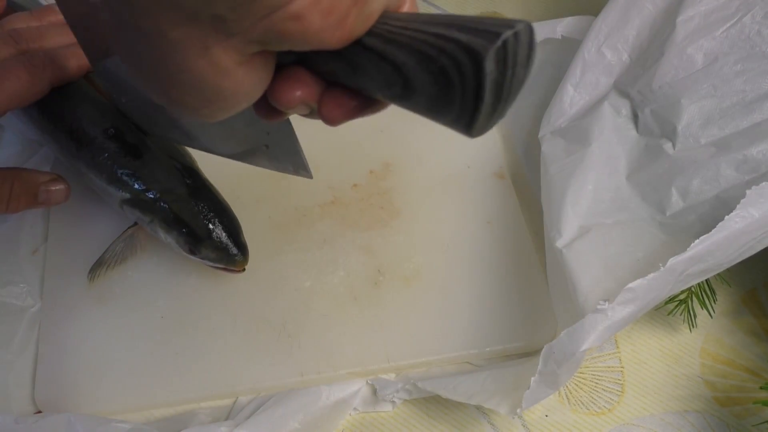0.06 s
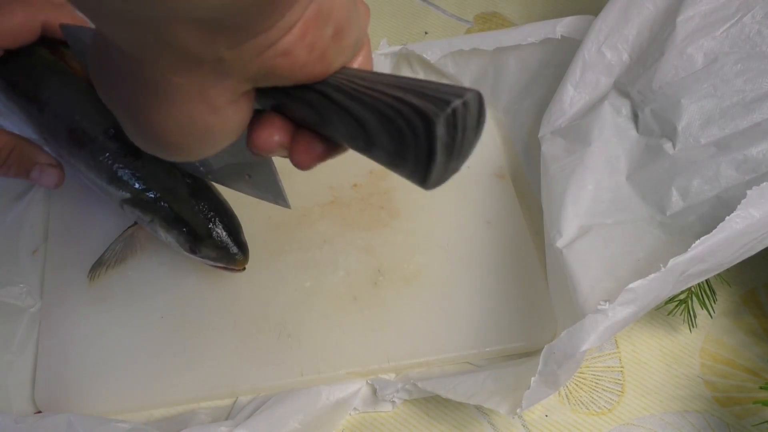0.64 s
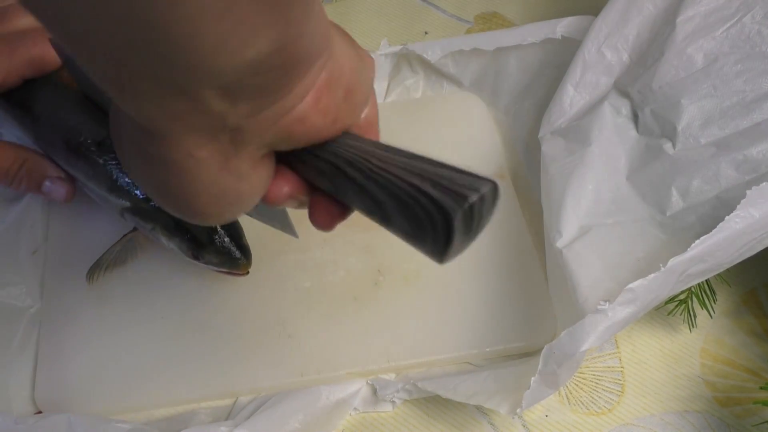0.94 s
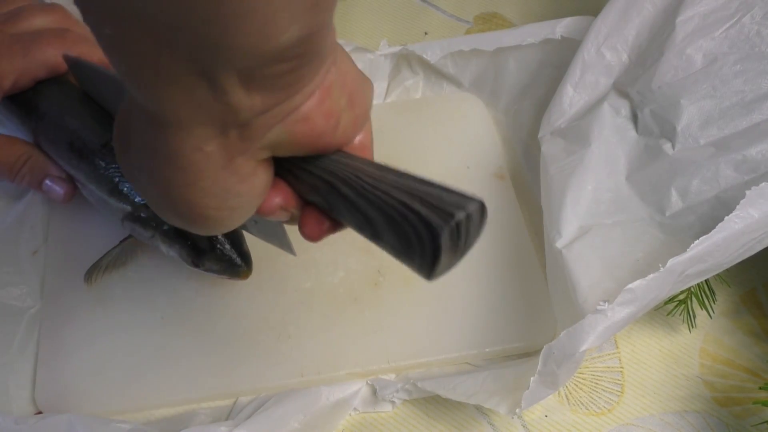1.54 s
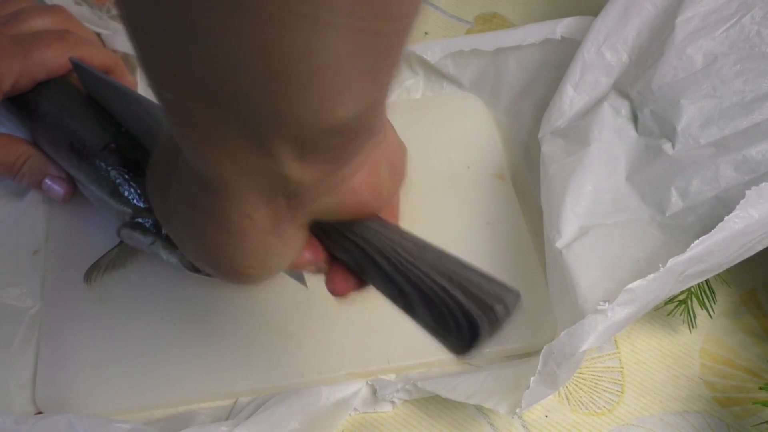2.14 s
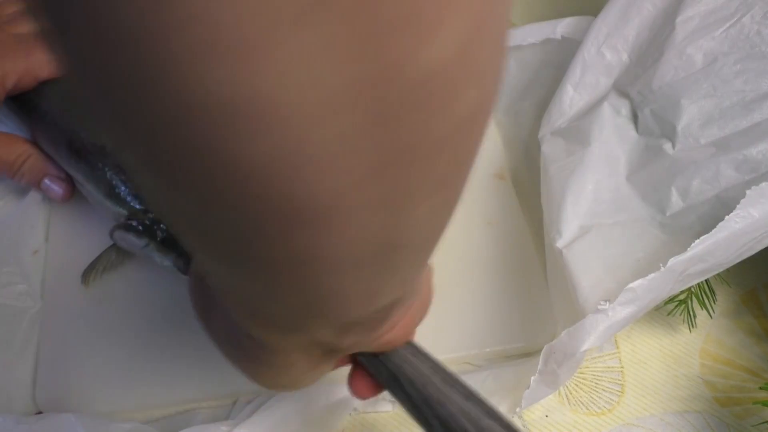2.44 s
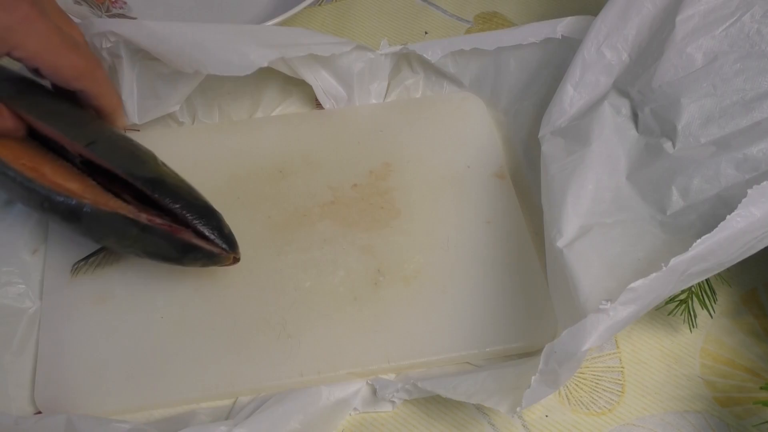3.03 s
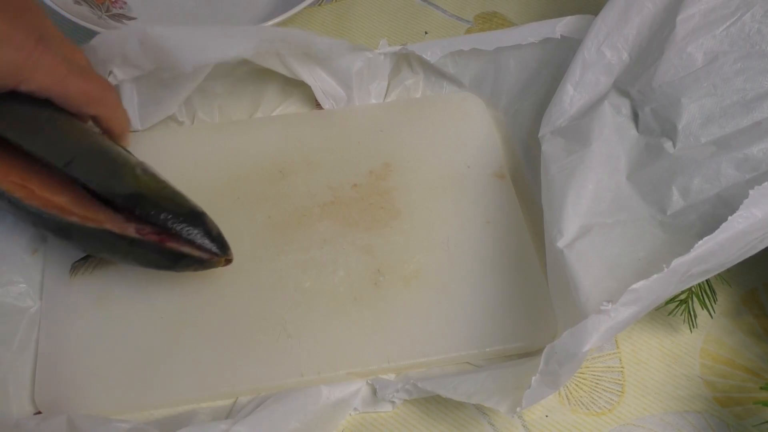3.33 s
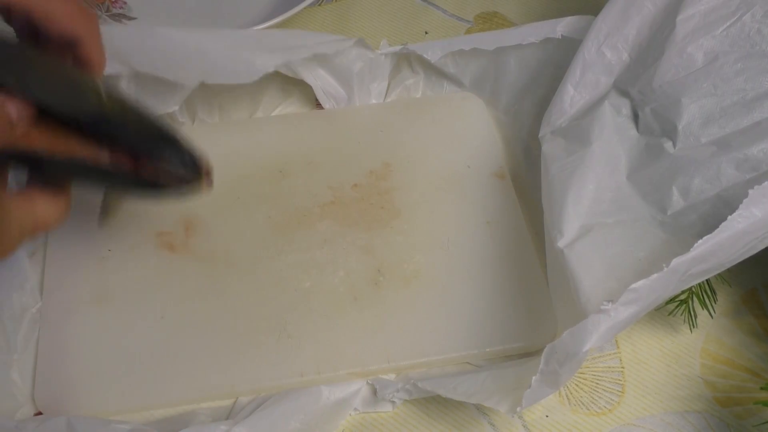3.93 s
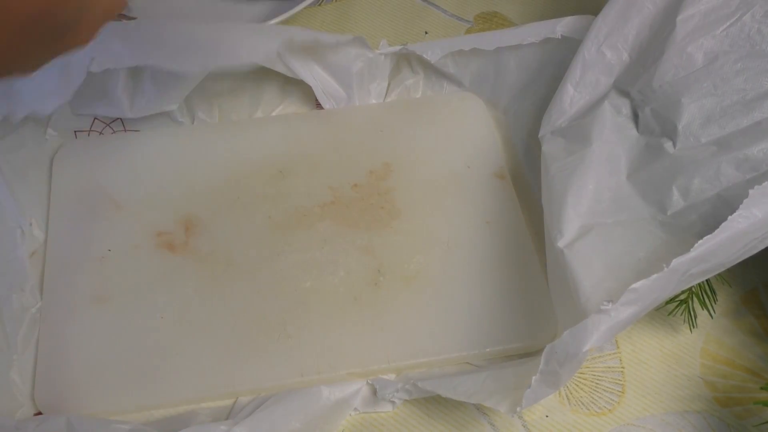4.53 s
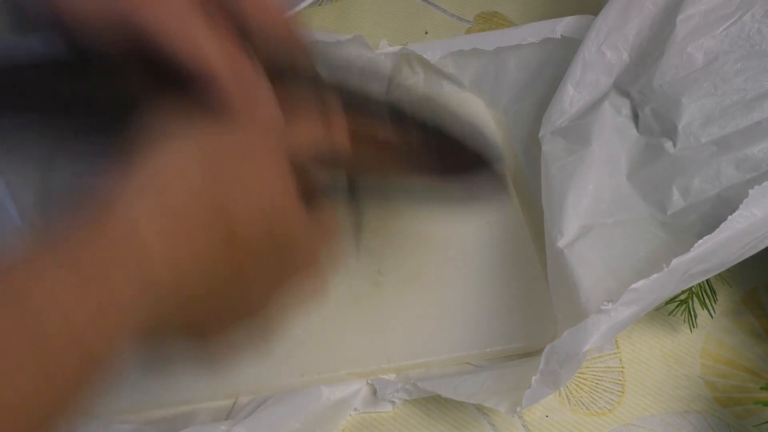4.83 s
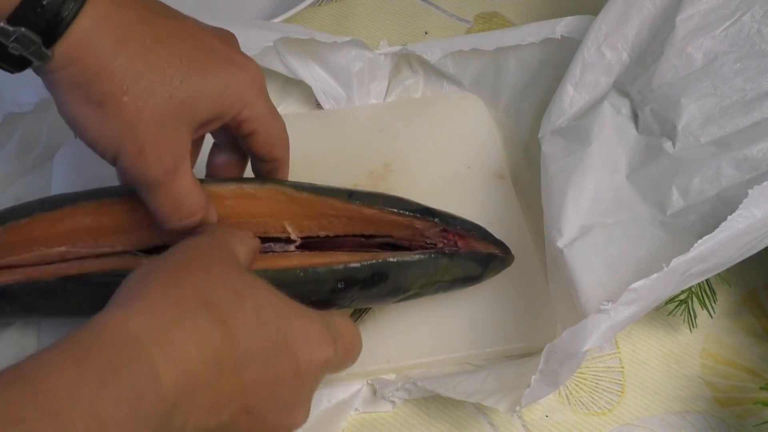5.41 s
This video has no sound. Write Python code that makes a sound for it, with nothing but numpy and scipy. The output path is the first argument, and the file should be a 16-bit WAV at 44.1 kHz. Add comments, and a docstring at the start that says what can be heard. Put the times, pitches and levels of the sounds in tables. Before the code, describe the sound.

A kitchen knife crunches through fish bones, clinks down on a plate, then plastic rustles as the fish is moved.

```python
"""A bone cracks and plastic rustles; then a big kitchen knife crunches through a fish's head on a plastic board.
Each brittle fracture is an impulse that rings the bone, cartilage tears as a dense train of ruptures, wet
flesh ticks, and the jerking blade drives the low modes of board and table. The knife is put down on a
plate, and both ring briefly. The fish is dragged over the crumpled sheet under the board, whose creases
buckle and crackle, and is laid back. A close stereo microphone hears it all in a small, live kitchen."""
import sys
import numpy as np
from scipy import signal
from scipy.fft import rfft, irfft, next_fast_len
from scipy.io import wavfile
from scipy.ndimage import uniform_filter1d

SR = 44100
rng = np.random.default_rng(int(sys.argv[2]) if len(sys.argv) > 2 else 0)


def dump_mix(stems):
    """Bounce the given channels to the path in sys.argv[1] as a 16-bit WAV at rate SR."""
    frames = np.atleast_2d(stems).T  # one column per channel
    limited = np.clip(frames, -1, 1)  # hard clip at full scale
    pcm = np.round(limited * 32767).astype(np.int16)
    wavfile.write(sys.argv[1], SR, pcm)


N = 245365

# Levels in the tables are relative: filters and mix gains follow.
# bones snapping, and a few faint wet ticks of flesh parting: start_s, crack_db, body_re_crack_db, pitch_hz
CRACKS_AND_TICKS = [(0.0518, -24.5, 1, 3260), (0.2263, -40.5, 1, 3280), (1.1031, -21, -5, 2170),
                    (1.146, -16, -15.5, 2210), (1.262, -34, 5, 2090), (1.4226, -31.5, -3, 2490),
                    (1.557, -25, 4.5, 1890), (1.6484, -21, -8, 2290), (1.857, -27, 5.5, 2860),
                    (1.909, -30, -1, 2880), (1.975, -30.5, 10.5, 2160), (1.988, -22.5, -5, 3000),
                    (2.144, -40, -9, 3300), (2.164, -33.5, -21, 2220), (2.2848, -28, 8, 2960),
                    (2.3267, -23, 5, 3000), (2.370, -13.5, 2.5, 1840), (2.604, -32.5, 1, 1302),
                    (2.656, -34.5, 21.5, 2324), (2.6962, -41.5, 29.5, 2400), (3.1372, -47.5, 15, 3020),
                    (5.289, -28.5, -11, 2980)]
# pushes of the blade through cartilage: start_s, length_s, crunch_db, swell_db, bone_pitch_hz, push_db
BLADE_CUTS = [(1.098, 0.058, -49, 7, 2400, -41.5), (1.258, .04, -54, -3, 2000, -52),
              (1.425, 0.044, -49, -7.5, 2510, -68), (1.549, 0.11, -42, 6.5, 2110, -33.5),
              (1.855, 0.13, -56, 0, 2950, -44), (1.976, .045, -44.5, -2, 2200, -35),
              (2.285, .088, -33.5, 2.5, 3087, -22.5), (2.653, .058, -26, -8, 2480, -22)]
# spectrum of the cracks and ticks: frequency_hz, level_db
SNAP_SPECTRUM = [(400, -1.5), (800, -4), (1400, 5), (2800, 4.5), (4200, -1.5), (6500, -2.5), (9500, 2),
                 (13000, 4), (16000, 4)]
# spectrum of tearing cartilage: frequency_hz, level_db
CRUNCH_SPECTRUM = [(400, -6.5), (800, -8.5), (1300, 0.5), (2600, -0.5), (4200, -3), (7000, -12), (9500, -2),
                   (13000, -11.5), (16000, -8)]
# modes of board and table: pitch_hz, level_db, t60_s
BOARD_MODES = [(62, -12, 0.46), (110.6, 1, 0.26), (129.8, 3, 0.23), (164.1, -2, 0.37), (196.1, 9, 0.12),
               (235.6, 3.5, 0.16), (271, 1, 0.12), (310.5, -2, 0.16), (363.3, -5, .15), (499, -13, 0.038),
               (653, -17.5, 0.035)]

# knife landing on the plate, handle then blade: start_s, knock_db, cutoff_hz, push_db, plate_ring_db
KNIFE_KNOCKS = [(3.2944, -9.5, 1260, -32, -44.5), (3.3649, -9.5, 4030, -49, -41.5)]
# modes of the knife, damped by the hand: pitch_hz, level_db, t60_s
DAMPED_KNIFE_MODES = [(315, -8, 0.027), (770, -6, 0.0097), (1010, -5.5, 0.011), (1250, -0.5, 0.019),
                      (1440, -13, 0.053), (1660, -4, 0.013), (2240, -12, 0.016), (3370, -11, .01),
                      (4440, -5, 0.0091)]
# free modes of the plate: pitch_hz, level_db, t60_s
PLATE_MODES = [(974, 3.5, 0.86), (1217, -17, 0.7), (1240, 9.5, .5), (1498, 0.5, 1), (1600, 3, 0.38),
               (1716, 0, 0.93), (1810, -1, 1), (1970, -8, 0.71), (2367, 11, 0.77), (2740, 0, 0.8),
               (3200, -18, 0.38), (4570, -19, 0.34)]
# mode of the table under the dropped blade: pitch_hz, level_db, t60_s
TABLE_MODES = [(62, -31, 0.053)]
# modes of the steel sliding over the rim: pitch_hz, level_db, t60_s
HELD_BLADE_MODES = [(1991, 2, .55), (2406, -5, .4), (3047, -14, .2), (3900, -16, .2), (4811, -12, .25)]
# modes of the steel once let go: pitch_hz, level_db, t60_s
FREE_BLADE_MODES = [(2406, -1, .16), (4811, -29, .3), (2415, -14, .45), (6850, -29, .2), (11700, -26, .08)]
# spectrum of steel scraping the rim: frequency_hz, level_db
SCRAPE_SPECTRUM = [(300, -3), (700, -5), (1200, -3), (2400, 7), (4500, 4), (7000, -4.5), (10000, 1),
                   (16000, -3)]

# fish and hands sliding on the sheet: fastest_s, rise_s, fall_s, rustle_db, dull_part_db, rasp_hz
SHEET_SLIDES = [(.415, 0.052, 0.042, -38, -2, 1210), (0.474, 0.052, 0.16, -40, 2.5, 1220),
                (.73, 0.031, 0.044, -43.5, 1.5, 1270), (.965, 0.15, 0.11, -39.5, 0.5, 1220),
                (3.17, 0.085, 0.12, -52.5, 8.5, 2400), (3.613, 0.082, 0.13, -33, -0.5, 1280),
                (3.952, .11, 0.063, -32.5, -4, 1960), (4.271, 0.23, 0.32, -39.5, -1.5, 2230),
                (4.69, 0.03, 0.22, -53, 5, 2650), (5.001, 0.025, 0.089, -25, -15, 2270),
                (5.10, 0.035, 0.044, -33.5, -4, 2250), (5.203, 0.044, .055, -36, -2.5, 2180),
                (5.442, 0.097, 0.059, -44, 0, 2080), (5.55, .04, .05, -47, 2.5, 2100)]
# sheet stirring under the hand that holds the fish: start_s, length_s, rustle_db
SHEET_STIRS = [(1.18, 0.31, -62), (2.5, 0.608, -59.5)]
# larger creases flipping over: start_s, level_db
CREASE_FLIPS = [(0.3867, -24), (.422, -17), (0.4829, -19), (0.6974, -28.5), (3.6242, -21), (4.305, -29),
                (4.356, -21), (4.957, -25), (5.3884, -29.5)]
# spectrum of the crackling sheet: frequency_hz, level_db
RUSTLE_SPECTRUM = [(100, -3), (330, 0), (600, -9.5), (850, -9), (1150, -1), (1650, -1.5), (2250, -0.5),
                   (4000, 0), (6500, -3.5), (9500, -0.5), (13000, -1.5), (16000, -6.5)]
# heavy fish shifting on the board: start_s, length_s, push_db
FISH_SHIFTS = [(.745, 0.019, -49.5), (3.64, 0.063, -50), (4.33, 0.094, -59), (5.06, 0.093, -49.5)]

# reverberation time of the kitchen: frequency_hz, t60_s
REVERB_TIMES = [(120, 0.51), (300, 0.54), (700, 0.79), (1500, 0.67), (4000, 0.42), (14000, 0.18)]
# strength of the reverberation: frequency_hz, level_db
REVERB_SPECTRUM = [(120, -6), (400, 1), (1200, 0), (4000, 0), (9000, 4.5), (15000, -11)]
# left-right likeness of the diffuse field: frequency_hz, correlation
FIELD_COHERENCE = [(200, 0.93), (500, 0.35), (1500, 0.067), (5000, -0.43), (9000, 0.0043), (13000, 0.75)]
# spectrum of the room tone: frequency_hz, level_db
ROOM_TONE_SPECTRUM = [(25, -9), (120, -5), (250, -3), (600, -14), (1200, -8), (2500, -9), (5000, -17),
                      (9000, -19), (16000, -22)]
# level difference between the microphones: frequency_hz, left_minus_right_db
MIC_BALANCE = [(60, 7.5), (150, -1), (300, -4), (600, -7.5), (1100, -6), (2300, -4), (4000, -4.5),
               (6600, -11), (9500, -4.5), (13000, -1)]
# phase difference between the microphones: frequency_hz, left_lead_rad
MIC_PHASE = [(30, -1), (120, -1.23), (350, -1.45), (700, -1.24), (1300, -0.62), (5000, -0.8),
             (14000, -0.14)]

DULL_HZ = 2050   # upper edge of the dull part of the rustle


def splitting():
    """Common excitation: the same pushes of the hand break the bones and crush the cartilage."""
    crunch_rows = [row[:4] for row in BLADE_CUTS]
    push_rows = [(s, length_s, push_db, 0) for s, length_s, *_, push_db in BLADE_CUTS]
    crunch = pushes(crunch_rows, bite_db=-11, ease_db=-4.5, ease_db_per_s=134)
    pressure = pushes(push_rows, bite_db=-29, ease_db=-13.5, ease_db_per_s=145)
    return cracks_and_ticks(crunch, pressure) + cartilage(crunch, pressure)


def pushes(rows, bite_db, ease_db, ease_db_per_s, bite_db_per_s=270):
    """Loading and yield: the envelope grows as the blade bites, jumps as tissue gives, then eases off."""
    t, out = np.arange(N) / SR, np.zeros(N)
    for s, length_s, level_db, swell_db in rows:
        age = t - s
        biting = bite_db + bite_db_per_s * age
        easing = swell_db + ease_db - ease_db_per_s * (age - length_s)
        shape_db = np.select([age < 0, age < length_s], [biting, swell_db * age / length_s], easing)
        out += amp(level_db + shape_db)
    return out


def cracks_and_ticks(crunch, pressure, q=3.84, ring_db=4.5, jolt_db=-6):
    """Impulse response: snapping bone or parting flesh rings briefly and, under load, jolts the board."""
    cracks, jolts = np.zeros((2, N))
    for s, crack_db, body_db, pitch_hz in CRACKS_AND_TICKS + splinters(crunch):
        burst = amp(crack_db) * crack(length_s=.0011)
        hollow = signal.lfilter(*signal.iirpeak(pitch_hz, q, fs=SR), burst)
        add(cracks, s, shelf(burst, body_db - 6, split_hz=4500) + amp(body_db + ring_db) * hollow)
    for s, *_ in CRACKS_AND_TICKS:
        add(jolts, s, [pressure[int((s + .005) * SR)]])   # as hard as the hand is pushing
    return colour(cracks, SNAP_SPECTRUM) + amp(jolt_db) * board(lowpass(jolts, hz=870))


def splinters(crunch, per_s=60, offset_db=-2.5, spread_db=12, body_db=8.5, detune=.06):
    """Brittle fracture: small bones snap at uneven intervals in each push, scaled by the crunch."""
    rows = []
    for s, length_s, _, _, bone_hz, _ in BLADE_CUTS:
        count = int(length_s * per_s)
        for k, (jitter, size, pitch) in enumerate(rng.uniform(-1, 1, (12, 3))[:count]):
            start_s = s + length_s * (k + .5 + jitter / 2) / count
            crack_db = 20 * np.log10(crunch[int(start_s * SR)]) + offset_db + spread_db * size
            rows.append((start_s, crack_db, body_db, bone_hz * (1 + detune * pitch)))
    return rows


def crack(length_s, size=1024):
    """Sudden stress release: one click, dispersed by all-pass echoes with lags under length_s."""
    burst = signal.unit_impulse(size)
    for lag in rng.uniform(.1, .7, 3) * length_s * SR:
        loop = np.r_[1, np.zeros(int(lag)), rng.choice([-.55, .55])]
        burst = signal.lfilter(loop[::-1], loop, burst)
    return burst * np.sqrt(length_s * SR)


def cartilage(crunch, pressure):
    """Superposition: many breaking fibres merge into a crunch while the jerky blade shakes the board."""
    fibres = grains(per_s=3500, spread_db=2.8)
    return colour(crunch * fibres, CRUNCH_SPECTRUM) + thuds(pressure)


def grains(per_s, spread_db, bands=9):
    """Shot noise of unit power: tiny random ruptures, each with its own size and spectrum."""
    onsets = rng.random(N) < per_s / SR
    sizes = onsets * amp(spread_db * np.minimum(rng.exponential(1, N), 4))
    edges = [60, *np.geomspace(900, 18000, bands)]
    out = np.zeros(N)
    for band in zip(edges, edges[1:]):
        out += butterworth(sizes * rng.standard_normal(N) + 1e-18, band, "band")
    return unit_power(out)


def thuds(pressure, jerks_per_s=700, fade_s=0.014):
    """Stick-slip friction: uneven jerks shake the board as hard as it is pushed, then the energy decays."""
    jerks = (rng.random(N) < jerks_per_s / SR) * rng.choice([-1, 1], N)
    shaking = board(jerks)
    local_rms = np.sqrt(np.abs(uniform_filter1d(shaking ** 2, size=1400)) + 1e-6)
    retained = np.exp(-1 / (fade_s * SR))
    energy = signal.lfilter([1 - retained], [1, -retained], pressure ** 2 + 1e-18)
    return np.sqrt(energy) * shaking / local_rms


def board(force):
    """Radiation efficiency: board and table ring in low modes but give off little deep bass."""
    return butterworth(ring(force, BOARD_MODES), 75, "high")


def wet_flesh(per_s=10, loudest_db=-39.5, spread_db=11):
    """Sparse random impulses: wet flesh ticks faintly from the first cut until the knife is put down."""
    ticks, start, end = np.zeros(N), BLADE_CUTS[0][0], KNIFE_KNOCKS[0][0]
    for when, size in rng.random((int((end - start) * per_s), 2)):
        tick = amp(loudest_db - spread_db * size) * crack(length_s=0.0013)
        add(ticks, start + when * (end - start), tick)
    return colour(ticks, SNAP_SPECTRUM)


def knife_on_plate(bounce_s=.0033, bounce_db=-7):
    """Impact: harder contact is brighter, so the handle knocks and the blade clacks; the plate rings."""
    blows, push, rim, clack = np.zeros((4, N))
    for s, knock_db, cutoff_hz, push_db, ring_db in KNIFE_KNOCKS:
        contact = amp(knock_db) * lowpass(signal.unit_impulse(256), cutoff_hz)
        add(blows, s, contact)
        add(blows, s + bounce_s, amp(bounce_db) * contact)
        add(push, s, [amp(push_db)])
        add(rim, s, [amp(ring_db)])
    drop_s = KNIFE_KNOCKS[-1][0]
    add(clack, drop_s, amp(-35) * shelf(crack(length_s=.003), low_db=23.5, split_hz=3900))
    thump = ring(signal.unit_impulse(N, int(drop_s * SR)), TABLE_MODES)
    knife = ring(blows, DAMPED_KNIFE_MODES) + colour(clack, SNAP_SPECTRUM)
    return knife + board(push) + thump + ring(rim, PLATE_MODES)


def blade_ring():
    """Free vibration: the steel sings between the knocks; the second damps it and starts a higher ping."""
    touch, drop = np.zeros((2, N))
    handle_s, drop_s = KNIFE_KNOCKS[0][0], KNIFE_KNOCKS[1][0]
    add(touch, handle_s + .012, [amp(-27)])
    add(drop, drop_s + .008, [amp(-19)])
    held = lowpass(np.arange(N) / SR < drop_s, hz=60)
    return held * ring(touch, HELD_BLADE_MODES) + ring(drop, FREE_BLADE_MODES)


def rim_scrape(level_db=-33.5, lead_s=0.016, rise_db_per_s=500):
    """Sliding friction: steel rubs the rim from just before the first knock until the blade drops."""
    t, handle_s, drop_s = np.arange(N) / SR, KNIFE_KNOCKS[0][0], KNIFE_KNOCKS[1][0]
    gain = amp(level_db + rise_db_per_s * np.minimum(t - handle_s + lead_s, 0)) * (t < drop_s)
    return lowpass(gain, hz=203) * colour(grains(per_s=9700, spread_db=2.5), SCRAPE_SPECTRUM)


def sheet():
    """Buckling: thin plastic crackles and single creases tick, while the shifting fish thuds the board."""
    crackle = colour(grains(per_s=6000, spread_db=2.5), RUSTLE_SPECTRUM)
    stirring = strokes(SHEET_STIRS) * shelf(crackle, low_db=8, split_hz=DULL_HZ)
    rustle = sliding(crackle) + stirring
    ticks = np.zeros(N)
    for s, level_db in CREASE_FLIPS:
        add(ticks, s, amp(level_db) * crack(length_s=.001))
    return amp(-1) * rustle + amp(-7) * colour(ticks, RUSTLE_SPECTRUM) + thuds(strokes(FISH_SHIFTS))


def sliding(crackle, drop_db=10, roundness=1.47, rasp_db=-8, rasp_q=6.1):
    """Friction noise follows speed: each slide swells and fades, and the rubbed fold resonates in a rasp."""
    t, out = np.arange(N) / SR, np.zeros(N)
    for s, rise_s, fall_s, level_db, dull_db, rasp_hz in SHEET_SLIDES:
        away = np.abs(t - s) / np.where(t < s, rise_s, fall_s)
        near = away < 4
        grit = shelf(crackle[near], dull_db, DULL_HZ)
        rasp = amp(rasp_db) * signal.lfilter(*signal.iirpeak(rasp_hz, rasp_q, fs=SR), grit)
        out[near] += amp(level_db - drop_db * away[near] ** roundness) * (grit + rasp)
    return out


def strokes(rows):
    """Amplitude envelope: each movement holds a steady level between tapered ends."""
    out = np.zeros(N)
    for s, length_s, level_db in rows:
        add(out, s, amp(level_db) * signal.windows.tukey(max(int(length_s * SR), 2), .2))
    return out


def kitchen(x, first_echo_s=0.00329, early_db=10, early_s=0.0022, size=32768):
    """Reverberation: dense reflections, strongest from near surfaces, decay at each band's own rate."""
    t, hz = np.arange(size) / SR, np.arange(size // 2 + 1) * SR / size
    noise, response = rfft(diffuse(size)), 0
    edges = np.geomspace(50, 20000, 15)
    for low, high in zip(edges, edges[1:]):
        centre = np.sqrt(low * high)
        late = np.exp(-np.log(1000) * t / at_hz(REVERB_TIMES, centre))
        early = amp(early_db) * np.exp(-t / early_s)
        decay = (late + early) * (t > first_echo_s)
        band = irfft(noise * (hz >= low) * (hz < high))
        response += amp(at_hz(REVERB_SPECTRUM, centre)) * band * decay / np.linalg.norm(decay)
    return signal.fftconvolve(x[None], response, axes=1)[:, :N]


def room_tone(level_db=-58.5):
    """Stationary noise: a faint hush arrives from all sides."""
    return amp(level_db) * np.array([colour(side, ROOM_TONE_SPECTRUM) for side in diffuse(N)])


def diffuse(size):
    """Diffuse-field coherence: two noises, alike where the microphones cannot tell directions apart."""
    mid, side = rfft(rng.standard_normal((2, size)))
    alike = np.clip(at_hz(FIELD_COHERENCE, np.arange(len(mid)) * SR / size), -1, 1)
    return irfft(np.sqrt((1 + alike) / 2) * mid + np.sqrt((1 - alike) / 2) * side * [[1], [-1]], size)


def ring(force, modes):
    """Modal superposition: the force drives damped sinusoids of alternating sign."""
    out = np.zeros(N)
    for k, (hz, level_db, t60_s) in enumerate(modes):
        r, w = np.exp(-np.log(1000) / (t60_s * SR)), 2 * np.pi * hz / SR
        mode = signal.lfilter([0, np.sin(w)], [1, -2 * r * np.cos(w), r * r], force + 1e-18)
        out += (-1) ** k * amp(level_db) * mode
    return out


def colour(x, spectrum, size=4096):
    """Minimum-phase filter of unit power gain; it rolls off below the spectrum's first point."""
    hz = np.arange(size // 2 + 1) * SR / size
    gain = unit_power(amp(at_hz(spectrum, hz)) * np.clip(hz / spectrum[0][0], .1, 1) ** 2)
    cepstrum = irfft(np.log(gain))
    cepstrum[1:size // 2] *= 2   # folding the cepstrum makes the filter causal
    cepstrum[size // 2 + 1:] = 0
    return signal.fftconvolve(x, irfft(np.exp(rfft(cepstrum))))[:N]


def shelf(x, low_db, split_hz):
    """Crossover: the low band is scaled, the high band inverted so the two add in phase."""
    return amp(low_db) * lowpass(x, split_hz) - butterworth(x, split_hz, "high")


def lowpass(x, hz):
    """Second-order roll-off above hz."""
    return butterworth(x, hz, "low")


def butterworth(x, hz, kind):
    """Filter with a maximally flat passband."""
    return signal.sosfilt(signal.butter(2, hz, kind, fs=SR, output="sos"), x)


def at_hz(points, hz):
    """Interpolation on a log-frequency axis."""
    frequency_hz, value = np.transpose(points)
    return np.interp(np.log(np.maximum(hz, 1)), np.log(frequency_hz), value)


def amp(db):
    """Decibels to amplitude ratio."""
    return 10 ** (np.asarray(db) / 20)


def unit_power(x):
    """Normalisation to a mean square of one."""
    return x / np.sqrt(np.mean(x ** 2) + 1e-20)


def add(track, s, sound):
    """Superposition of a short sound at s seconds."""
    start = int(np.clip(round(s * SR), 0, N - 1))
    track[start:start + len(sound)] += sound[:N - start]


def scene():
    """Direct and reverberant fields add: the sources are close by on the table, and the kitchen answers."""
    cutting = splitting() + wet_flesh()
    rustle = sheet()
    laid_down = knife_on_plate() + rim_scrape()
    ping = blade_ring()
    direct = cutting + amp(2) * rustle + laid_down + ping
    into_room = amp(-2) * cutting + amp(-4.44) * rustle + amp(-2.5) * laid_down + amp(-8) * ping
    return direct + kitchen(into_room) + room_tone()


def record(dry, cutoff_hz=15900):
    """Stereo level and phase differences: the right leads and, above the bass, is louder; the top is cut."""
    size = next_fast_len(N + 4096)
    hz = np.arange(size // 2 + 1) * SR / size
    half_difference = amp(at_hz(MIC_BALANCE, hz) / 2) * np.exp(.5j * at_hz(MIC_PHASE, hz))
    pair = irfft(rfft(dry, size) * np.array([half_difference, 1 / half_difference]), size)[:, :N]
    return signal.sosfilt(signal.ellip(10, .2, 80, cutoff_hz, fs=SR, output="sos"), pair)


dry = scene()
out = record(dry)
dump_mix(out)
```